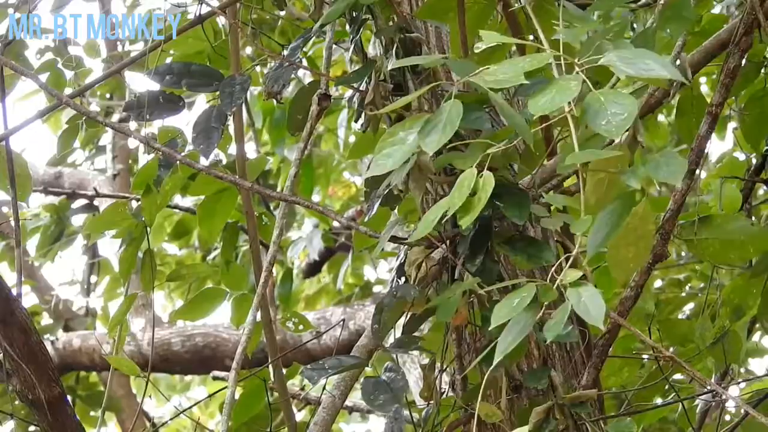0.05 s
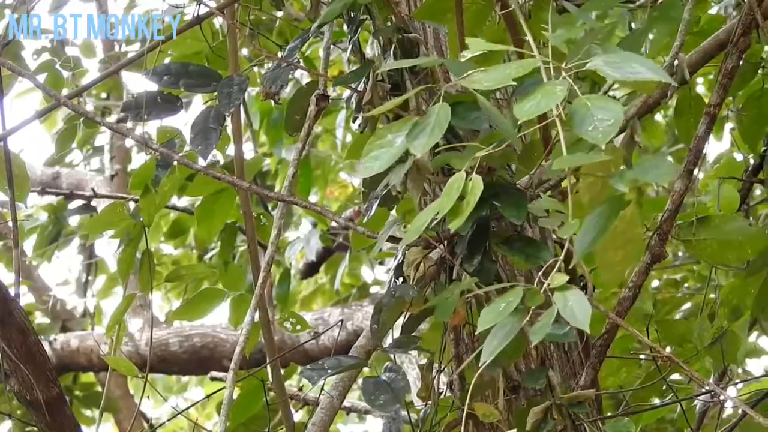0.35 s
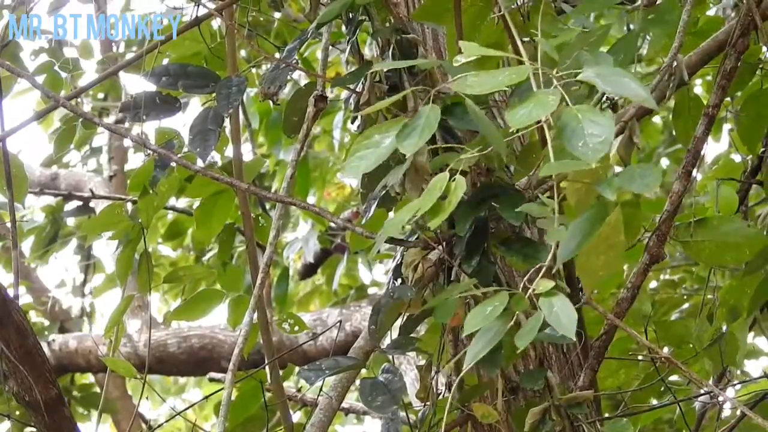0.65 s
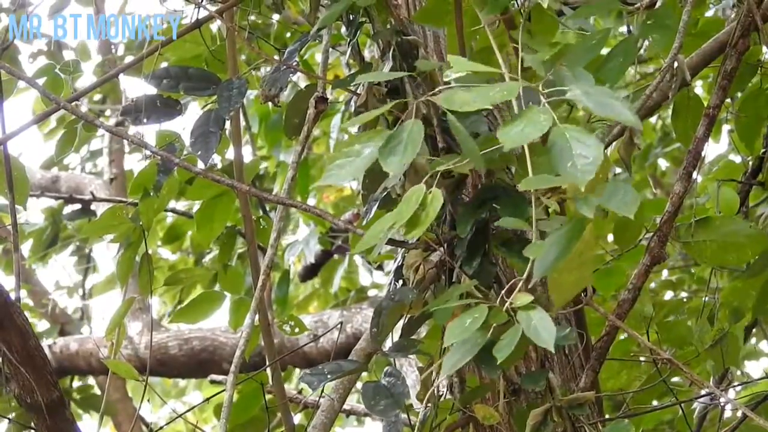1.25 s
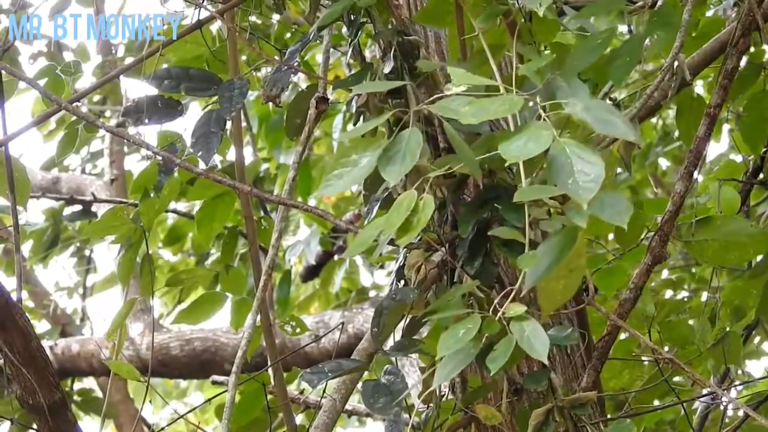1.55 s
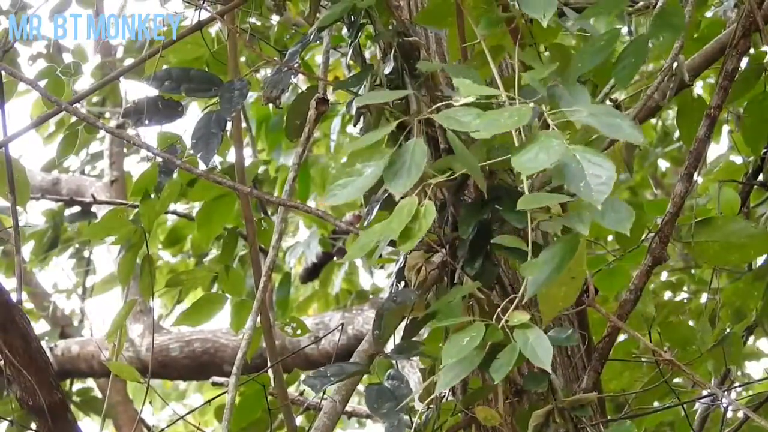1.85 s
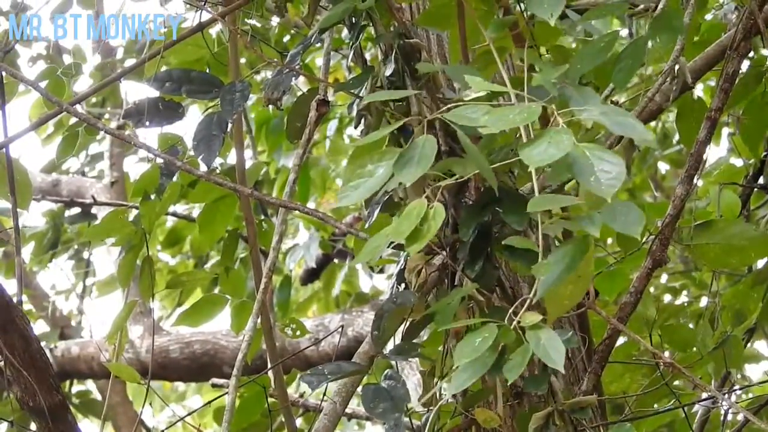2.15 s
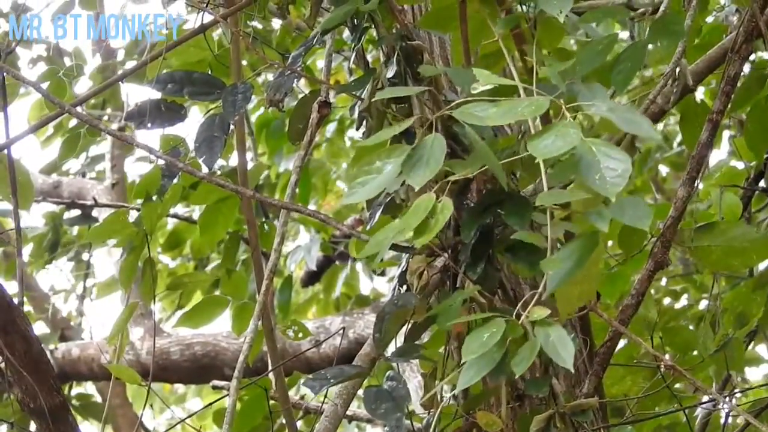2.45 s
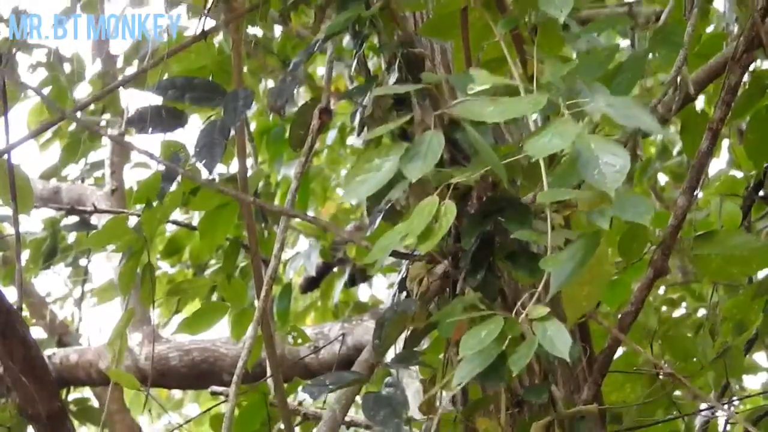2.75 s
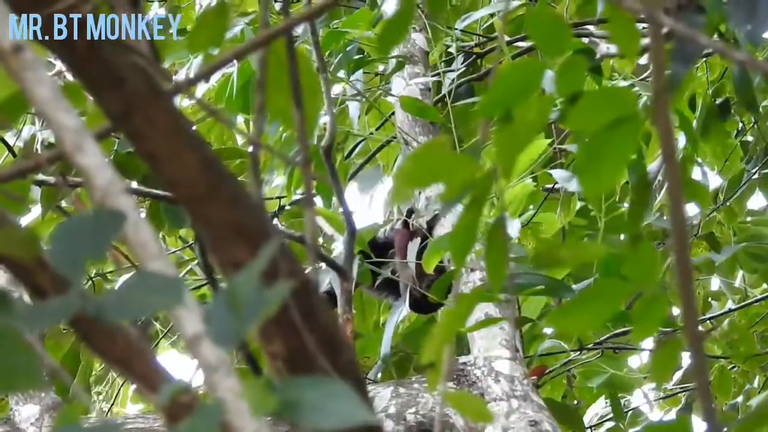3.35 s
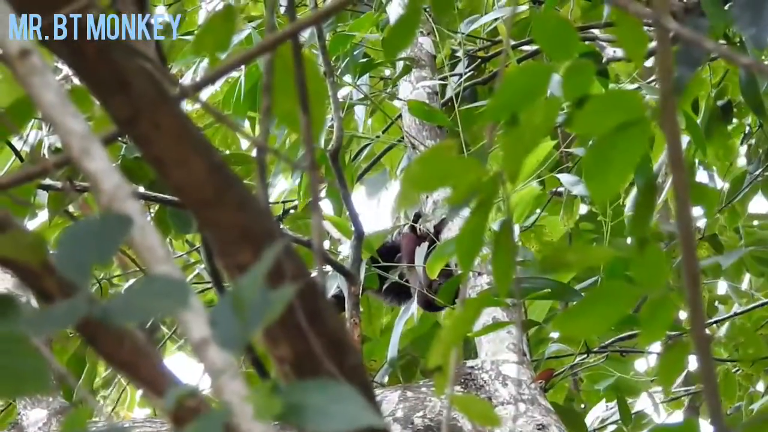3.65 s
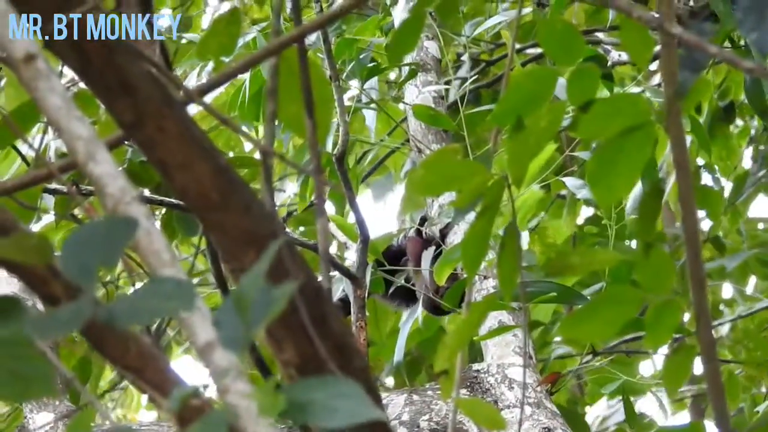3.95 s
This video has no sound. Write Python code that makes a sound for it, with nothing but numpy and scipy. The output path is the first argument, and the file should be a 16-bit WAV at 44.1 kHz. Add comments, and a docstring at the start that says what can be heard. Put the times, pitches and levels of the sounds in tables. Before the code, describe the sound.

Thin upward bird whistles in a quiet forest, with soft taps and a brief leaf crackle.

```python
"""A small bird's thin rising whistles scatter among the trunks and leaves of a forest.
Far insects hiss over a low rumble and faint engine-like drones; a breeze thumps on the left microphone.
Three soft handling taps on the camera body thud and ring hollow, and dry leaves give the odd snap.
All falls silent for half a second; the hiss and rumble return and leaves crackle briefly close by."""
import sys
import numpy as np
from scipy import signal
from scipy.fft import rfft, irfft
from scipy.io import wavfile

SR = 44100
rng = np.random.default_rng(int(sys.argv[2]) if len(sys.argv) > 2 else 0)


def materialize(psi):
    """Save the field psi as 16-bit PCM at rate SR to the path in sys.argv[1].

    A 1-D psi becomes a single channel; in a 2-D psi each row is a channel.
    """
    bounded = np.clip(np.atleast_2d(psi).T, -1, 1)
    quanta = np.round(bounded * 32767).astype(np.int16)
    wavfile.write(sys.argv[1], SR, quanta)


N = 176400
TIME = np.arange(N) / SR
FREQS = np.maximum(np.fft.rfftfreq(N, 1 / SR), 1)
LEFT_RIGHT = np.array([[1], [-1]])
SILENCE_START_S, SILENCE_END_S = 2.556, 3.0545


# pitch curve per whistle: (time [s], pitch [Hz])
WHISTLE_PITCH = [
    [(0.03, 4650), (0.09, 5050), (0.135, 5550), (0.16, 6300)],
    [(0.283, 4218), (0.321, 4602), (0.347, 5000), (0.369, 5144), (0.389, 5472), (0.401, 5791),
     (0.427, 6400)],
    [(1.465, 4055), (1.503, 4349), (1.525, 4818), (1.567, 5147), (1.591, 5480), (1.609, 5896),
     (1.625, 6750)],
    [(2.48, 4050), (2.512, 4400), (2.554, 4960), (2.58, 5200)],
]
# level curve per whistle: (time [s], level [dB])
WHISTLE_LEVEL = [
    [(0.03, -42.5), (0.09, -35.5), (0.135, -35.5), (0.16, -36)],
    [(0.283, -41), (0.321, -29), (0.349, -39), (0.369, -27), (0.401, -24), (0.427, -34)],
    [(1.465, -41), (1.503, -36.5), (1.535, -28.5), (1.583, -33), (1.595, -24), (1.612, -25), (1.625, -35)],
    [(2.48, -35), (2.495, -32), (2.52, -39), (2.55, -25.5)],
]
# direct path per whistle: (gain [dB])
WHISTLE_DIRECT_DB = [-10, -2.5, -3, -9]
WHISTLE_EDGE_S, WHISTLE_JITTER, WHISTLE_FLUTTER_DB, BIRD_PAN_DB = 0.0035, 0.004, 3.5, 1.8
RASP_FROM_HZ, RASP_FULL_HZ, RASP_DEPTH = 5200, 6100, 0.035

def bird():
    """Near-pure tones sweep upward, turn ragged at the top and leave a wash of echoes."""
    direct, sung = np.zeros(N), np.zeros(N)
    for pitch, level, direct_db in zip(WHISTLE_PITCH, WHISTLE_LEVEL, WHISTLE_DIRECT_DB):
        hz = time_curve(pitch)
        rasp = np.interp(hz, [RASP_FROM_HZ, RASP_FULL_HZ], [0, RASP_DEPTH])
        hz = hz * (1 + WHISTLE_JITTER * drift(90) + rasp * drift(305))
        tone = unit_rms(sine(hz) * from_db(WHISTLE_FLUTTER_DB * drift(62)))
        gate = fade(pitch[0][0], pitch[-1][0], WHISTLE_EDGE_S)
        whistle = tone * gate * from_db(time_curve(level))
        direct += from_db(direct_db) * whistle
        sung += whistle
    return direct * from_db(LEFT_RIGHT * BIRD_PAN_DB / 2) + forest_echoes(sung)


# leaf scattering, stronger for high notes: (frequency [Hz], gain [dB])
LEAF_SCATTER = [(4000, -4.5), (4700, -3.5), (5200, -1.5), (5700, 1), (6300, -1), (7000, 0)]
ECHO_BUILD_S, ECHO_SIDE_DB = 0.008, -7.5
TRUNKS_T60_S, TRUNKS_DB, FOLIAGE_T60_S = 0.099, -4.5, 0.74

def forest_echoes(x):
    """Quick echoes from the nearest trunks, then countless small ones from leaves further off."""
    trunks = from_db(TRUNKS_DB) * strike(0, ECHO_BUILD_S, TRUNKS_T60_S)
    foliage = strike(0, ECHO_BUILD_S, FOLIAGE_T60_S)
    response = unit_rms(stereo_noise(ECHO_SIDE_DB) * (trunks + foliage)) / np.sqrt(N)
    return irfft(rfft(x) * rfft(response) * gain_curve(LEAF_SCATTER), N)


# leaves brushing: (centre [s], half length [s], level [dB], treble offset [dB])
BRUSHES = [(0.859, .007, -45, 10), (3.301, 0.023, -34.5, -16), (3.333, 0.022, -44.5, 4),
           (3.374, .014, -33, -19), (3.406, 0.015, -34.5, -1)]
# leaf snaps: (time [s], level [dB])
SNAPS = [(0.859, -34), (2.215, -25), (3.2444, -31), (3.297, -34.5), (3.308, -20), (3.3185, -31),
         (3.334, -20), (3.344, -23), (3.38, -27), (3.385, -27)]
# spectra of brushing, thin leaf edges and snaps: (frequency [Hz], relative level [dB])
BRUSH_SPECTRUM = [(300, -6), (800, -22), (1500, 4), (2200, -10), (3500, -2.5), (5500, -1), (6800, 9.5),
                  (8300, -16), (10500, -21), (14000, -44)]
EDGE_SPECTRUM = [(3000, -40), (6500, -12), (7800, 6), (8800, -4.5), (10500, -14), (14000, -40)]
SNAP_SPECTRUM = [(1000, -27), (2500, -7), (5500, -5), (6800, 8), (8000, -3), (10000, -17), (11500, -21.5),
                 (13000, -31), (15000, -48)]
SNAP_ATTACK_S, SNAP_T60_S, EDGE_DB, LEAF_SIDE_DB = 0.00069, 0.011, -4.5, -4.5
CRACKLES_PER_S, CRACKLE_SPREAD_DB = 12000, 2.5

def leaves():
    """Dry leaves brush in swells of tiny crackles, with a few sharp snaps among them."""
    body, edges = crackle(BRUSH_SPECTRUM), crackle(EDGE_SPECTRUM)
    brushing = sum(swell(centre_s, half_s, db) * (body + from_db(EDGE_DB + treble_db) * edges)
                   for centre_s, half_s, db, treble_db in BRUSHES)
    snap_envelope = sum(from_db(db) * strike(start_s, SNAP_ATTACK_S, SNAP_T60_S) for start_s, db in SNAPS)
    return brushing + snap_envelope * coloured(stereo_noise(LEAF_SIDE_DB), SNAP_SPECTRUM)


def crackle(spectrum):
    """Dense tiny clicks of uneven size."""
    clicks = rng.random(N) < CRACKLES_PER_S / SR
    sizes = from_db(CRACKLE_SPREAD_DB * np.clip(rng.standard_normal(N), -2, 2))
    return coloured(clicks * sizes * stereo_noise(LEAF_SIDE_DB), spectrum)


# handling taps: (time [s], level [dB], treble offset [dB])
TAPS = [(2.199, -31, -9.5), (2.352, -34.5, -4), (2.404, -33, 1)]
# contact noise spectra: (frequency [Hz], relative level [dB])
TAP_BODY = [(350, -25), (650, -5.5), (900, 4.5), (1150, -3), (1500, -13), (3000, -35), (12000, -70.5)]
TAP_TREBLE = [(1000, -22.5), (1700, 2.5), (2700, 6), (3600, -14.5), (8000, -25.5), (14000, -62)]
TAP_THUD = [(100, -17.5), (300, -6.5), (480, 3), (750, -8.5), (1200, -21.5), (8000, -71)]
# hollow ring: (frequency [Hz], relative level [dB], T60 [s])
TAP_MODES = [(840, 0, 0.064), (951, -8.5, .05), (1180, -6, 0.066)]
TAP_ATTACK_S, TAP_T60_S, TAP_SIDE_DB = 0.006, 0.056, -15
TAP_TREBLE_DB, TAP_THUD_DB, TAP_RING_DB = -2.5, -6.5, -3.5

def handling_taps():
    """Soft taps on the camera body: a burst of contact noise, a wide dull thud and a hollow ring."""
    body = coloured(stereo_noise(TAP_SIDE_DB), TAP_BODY)
    treble = coloured(stereo_noise(TAP_SIDE_DB), TAP_TREBLE)
    thud = from_db(TAP_THUD_DB) * LEFT_RIGHT * coloured(rng.standard_normal(N), TAP_THUD)
    out = np.zeros((2, N))
    for start_s, db, treble_db in TAPS:
        contact = body + thud + from_db(TAP_TREBLE_DB + treble_db) * treble
        tap = strike(start_s, TAP_ATTACK_S, TAP_T60_S) * contact
        for hz, mode_db, t60_s in TAP_MODES:
            ring = strike(start_s, TAP_ATTACK_S, t60_s) * np.sin(2 * np.pi * hz * (TIME - start_s))
            tap += from_db(TAP_RING_DB + mode_db) * ring
        out += from_db(db) * tap
    return out


# breeze puffs: (centre [s], half length [s], level [dB])
PUFFS = [(0.48, 0.02, -37), (0.57, .025, -29.5), (0.65, 0.019, -28.5), (0.96, 0.03, -42)]
# puff spectrum: (frequency [Hz], relative level [dB])
PUFF_SPECTRUM = [(15, -34), (28, -14), (45, 7), (80, -7), (130, -19.5), (300, -44.5), (1000, -77.5)]

def breeze():
    """Moving air thumps softly on the left microphone."""
    left = sum(swell(*puff) for puff in PUFFS) * coloured(rng.standard_normal(N), PUFF_SPECTRUM)
    return np.array([left, np.zeros(N)])


# far engines: (start [s], end [s], pitch [Hz], level [dB])
DRONES = [(0.045, 1.264, 160, -40.5), (1.45, 3.2, 72, -43), (1.27, 2.5, 104, -46.5),
          (2.98, 4.05, 97, -36.5), (2.99, 4.12, 229, -48)]
DRONE_FADE_S, DRONE_WANDER, DRONE_WAVER_DB = 0.16, 0.01414, 2.5

def engine_drones():
    """Far engines hum as low wavering tones that fade in and out."""
    out = np.zeros(N)
    for start_s, end_s, hz, db in DRONES:
        tone = sine(hz * (1 + DRONE_WANDER * drift(6.2)))
        waver = from_db(DRONE_WAVER_DB * drift(3.4))
        out += from_db(db) * fade(start_s, end_s, DRONE_FADE_S) * unit_rms(tone * waver)
    return out


# air and insect hiss: (time [s], level [dB])
HISS_LEVEL = [(0, -34), (0.9, -33), (1.4, -33.5), (2.0, -34.5), (2.55, -34), (3.06, -38.4), (3.5, -38.5),
              (4, -39)]
# spectra before and after the silence: (frequency [Hz], relative level [dB])
HISS_BEFORE = [(100, -23.5), (300, 0), (400, -3.5), (600, -3), (1000, -5.5), (1500, -8), (3700, -7),
               (4500, -4), (5500, -2.5), (6100, 0), (6450, 2), (6900, -0.5), (7500, -6), (8300, -12),
               (9500, -19), (11000, -25.5), (12000, -35), (14900, -44)]
HISS_AFTER = [(100, -32), (300, -1), (500, -3.5), (900, -7), (1500, -10.5), (4000, -12), (4500, -7.5),
              (5400, -8), (6500, -3.5), (7200, -7.5), (7800, -16), (9100, -24), (12000, -36.5),
              (14900, -43)]
RUMBLE_BEFORE = [(18, -35.5), (28, -17.5), (37, -5.5), (55, -2.5), (72, 1.5), (110, 3), (135, -2.5),
                 (200, -2.5), (260, -5), (330, -22), (500, -48.5), (2000, -79)]
RUMBLE_AFTER = [(18, -32), (28, -14), (40, -12), (60, 0), (100, 0), (135, 0), (170, -7.5), (240, -12.5),
                (330, -28.5), (500, -57), (2000, -80)]
# stereo width: (frequency [Hz], side over mid [dB])
WIDTH_BEFORE = [(40, -5.5), (90, -14), (200, -19.5), (450, -16), (1100, -12), (2200, -9), (4200, -7),
                (6000, -1), (7200, -30), (10000, -20), (12500, 3.5)]
WIDTH_AFTER = [(40, -7), (90, -15), (200, -18), (450, -14.5), (1100, -13), (2200, -9.5), (4200, -5.5),
               (6200, -2.5), (9000, -0.5)]
RUMBLE_BEFORE_DB, RUMBLE_AFTER_DB, SHIMMER_DB = -37, -34, 0.36

def insects_and_rumble():
    """Air and far insects hiss, peaking near 6.5 kHz, over a rumble; both change across the silence."""
    hiss_gain = from_db(time_curve(HISS_LEVEL) + SHIMMER_DB * drift(6.6))
    before = hiss_gain * diffuse(HISS_BEFORE, WIDTH_BEFORE)
    before += from_db(RUMBLE_BEFORE_DB) * diffuse(RUMBLE_BEFORE, WIDTH_BEFORE)
    after = hiss_gain * diffuse(HISS_AFTER, WIDTH_AFTER)
    after += from_db(RUMBLE_AFTER_DB) * diffuse(RUMBLE_AFTER, WIDTH_AFTER)
    return np.where(TIME < (SILENCE_START_S + SILENCE_END_S) / 2, before, after)


# background balance: (frequency [Hz], left over right [dB])
BALANCE = [(30, 2.7), (70, 1.2), (200, .6), (3000, .7), (8000, 0.11)]

def diffuse(spectrum, width):
    """Noise from all around, leaning slightly left."""
    mid, side = rfft(rng.standard_normal((2, N)))
    channels = mid + LEFT_RIGHT * side * gain_curve(width)
    balance = gain_curve(BALANCE) ** (LEFT_RIGHT / 2)
    return unit_rms(irfft(channels * balance * gain_curve(spectrum), N))


def from_db(db):
    """Decibels to gain."""
    return 10 ** (np.asarray(db) / 20)


def unit_rms(x):
    """Scale to unit power."""
    return x / np.sqrt(np.mean(x ** 2) + 1e-20)


def time_curve(points):
    """A (time [s], value) table at every sample."""
    return np.interp(TIME, *np.transpose(points))


def gain_curve(points):
    """A (frequency [Hz], level [dB]) table as a gain per bin."""
    hz, db = np.transpose(points)
    return from_db(np.interp(np.log(FREQS), np.log(hz), db))


def coloured(x, spectrum):
    """Filter by a spectrum, at unit power."""
    return unit_rms(irfft(rfft(x) * gain_curve(spectrum), N))


def drift(rate_hz):
    """Random wander below about rate_hz, at unit power."""
    return unit_rms(irfft(rfft(rng.standard_normal(N)) / (1 + (FREQS / rate_hz) ** 2), N))


def stereo_noise(side_db):
    """White noise of a given width."""
    mid, side = rng.standard_normal((2, N))
    return mid + LEFT_RIGHT * side * from_db(side_db)


def sine(hz):
    """A tone following a pitch curve."""
    return np.sin(2 * np.pi * np.cumsum(hz) / SR)


def fade(start_s, end_s, edge_s):
    """A gate with linear edges."""
    return np.clip(np.minimum(TIME - start_s, end_s - TIME) / edge_s, 0, 1)


def strike(start_s, attack_s, t60_s):
    """Linear rise, exponential decay."""
    age_s = np.maximum(TIME - start_s, 0)
    return np.minimum(age_s / attack_s, 1) * from_db(-60 * np.maximum(age_s - attack_s, 0) / t60_s)


def swell(centre_s, half_s, db):
    """A bell-shaped envelope."""
    return from_db(db) * np.exp(-((TIME - centre_s) / half_s) ** 2 / 2)


def scene():
    """The forest in stereo."""
    return insects_and_rumble() + engine_drones() + breeze() + bird() + handling_taps() + leaves()


CUTOFF_HZ = 15200

def record(dry):
    """The sound drops out for half a second; a steep low-pass cuts the top."""
    live = (TIME < SILENCE_START_S) | (TIME > SILENCE_END_S)
    lowpass = signal.ellip(10, 0.1, 80, CUTOFF_HZ, fs=SR, output="sos")
    return signal.sosfilt(lowpass, dry * live + 1e-18)


dry = scene()
out = record(dry)
materialize(out)
```